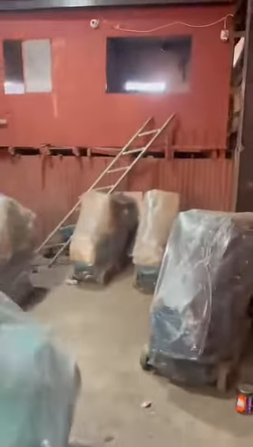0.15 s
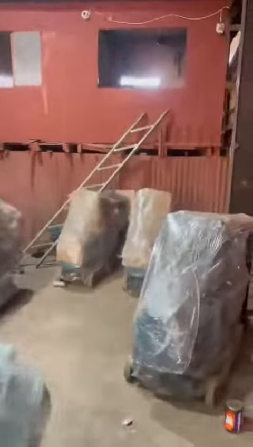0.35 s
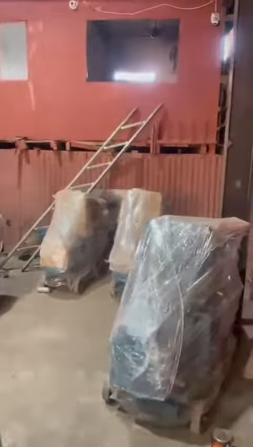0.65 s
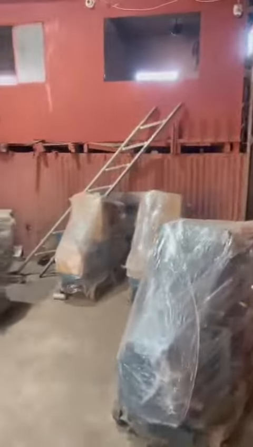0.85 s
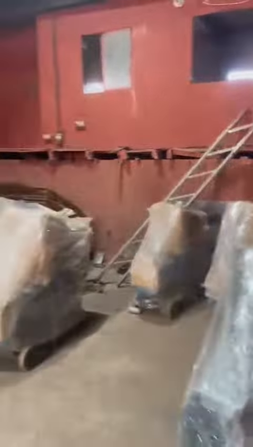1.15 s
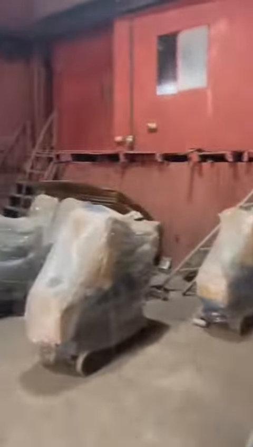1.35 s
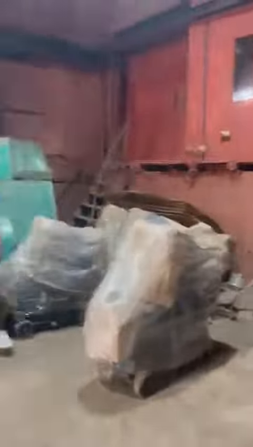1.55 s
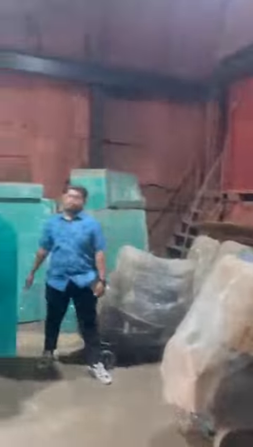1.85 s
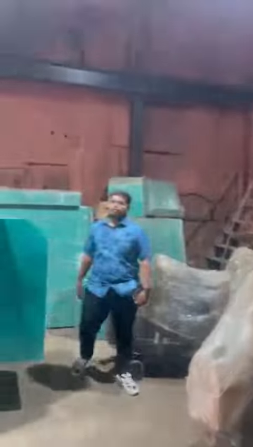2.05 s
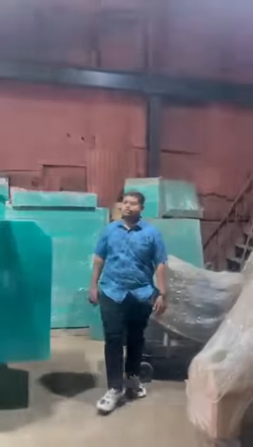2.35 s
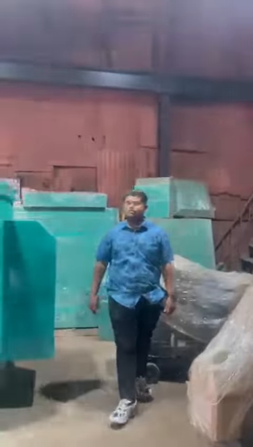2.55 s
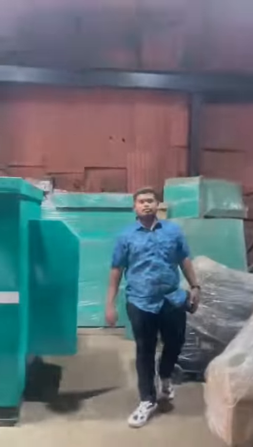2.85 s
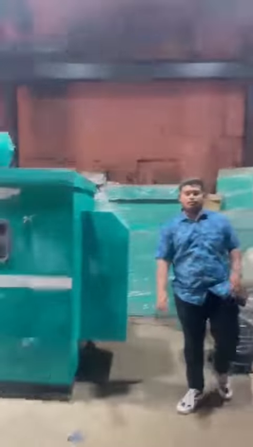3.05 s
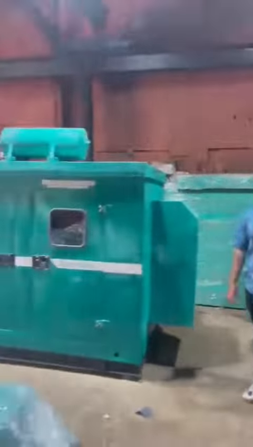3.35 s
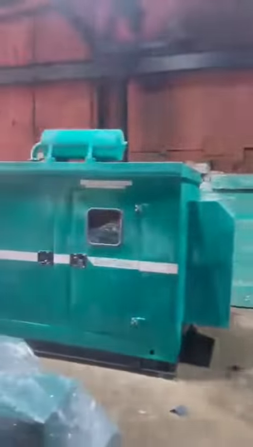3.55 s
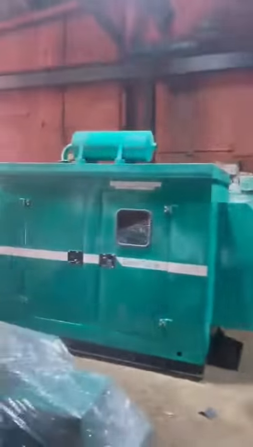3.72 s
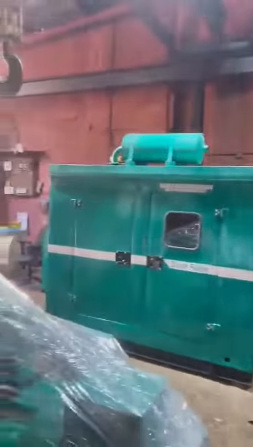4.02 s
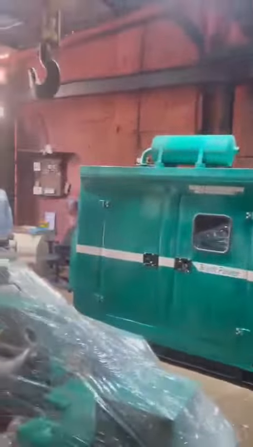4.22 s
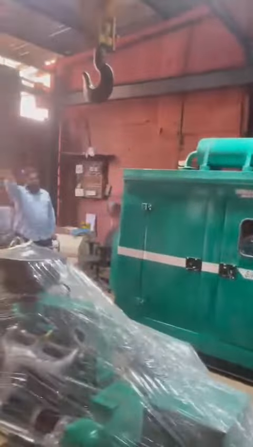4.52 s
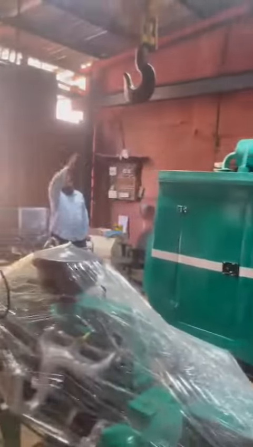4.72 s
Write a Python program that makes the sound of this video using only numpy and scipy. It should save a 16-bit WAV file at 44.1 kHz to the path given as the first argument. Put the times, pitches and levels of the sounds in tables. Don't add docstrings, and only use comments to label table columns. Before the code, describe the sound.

Inside a hard-walled steel workshop, an enclosed four-cylinder diesel generator runs throughout at unchanging speed. Its loud hum centres on low tones around 53 and 107 Hz, with higher buzzing harmonics and rough panel rumble. The tones drift and beat, swelling and fading as a handheld phone turns through wall reflections. Wide fan and combustion hiss flickers gently above: distant and bright at 0 s, growing louder and duller by 1.8 s, softer and brighter around 2.5 to 3.7 s, then louder again near 4.3 s. A thin airy whistle-like resonance near 2.5 kHz strengthens around 4.1 s. Faint valve ticks repeat about thirteen times per second with a short metallic ring, harder ones near 1.27, 2.54 and 3.5 to 3.75 s. Brief, soft sheet-metal rattles come at 1.3, 2.4 and 3.0 s. Wide stereo, steep loss of top treble; the engine is still running at the end, about 4.9 s.

```python
import sys
import numpy as np
from scipy import signal
from scipy.fft import rfft, irfft, next_fast_len
from scipy.io import wavfile
from scipy.ndimage import uniform_filter1d, minimum_filter1d, map_coordinates

SR = 44100
rng = np.random.default_rng(int(sys.argv[2]) if len(sys.argv) > 2 else 0)


def transcribe(signal):
    frames = np.atleast_2d(signal).T
    limited = np.clip(frames, -1, 1)
    pcm = np.round(limited * 32767).astype(np.int16)
    wavfile.write(sys.argv[1], SR, pcm)


def linear_from_db(decibels):
    return 10 ** (np.asarray(decibels, float) / 20)


N = 215031
TIME_S = np.arange(N) / SR
PAD = next_fast_len(N, True)
BIN_HZ = np.arange(PAD // 2 + 1) * SR / PAD

CYCLE_HZ = 13.329
SOUND_M_S = 343

# [order, level/dB rms]
DIRECT_ORDERS = [(4, -18.5), (6, -32), (8, -16.5), (9, -24.5), (10, -28.5), (11, -33.5), (12, -25.0),
                 (13, -27), (16, -33), (18, -29), (20, -35.0), (21, -36.5), (26, -28.5), (28, -35),
                 (30, -35.5), (32, -43)]
# [order, level/dB against direct, path shortening speed/(m/s), moment of opposition t/s]
WALL_ECHOES = [(4, -3.8, 1.504, 2.79), (4, -1.0, 1.086, 0.0), (6, -11.8, 0.724, 0.94),
               (8, -9.6, 0.731, 0.71), (8, -17.7, 1.314, 0.9), (9, -15.8, 1.299, 3.57),
               (9, -8.7, 0.359, 0.0), (10, -5.1, 0.443, 4.39), (10, -8.0, -0.653, 2.89),
               (11, -10.2, -1.856, 0.23), (12, -12.5, -1.309, 1.48), (12, -7.3, -0.83, 1.51),
               (13, -1.0, -0.435, 4.23), (13, -11.3, -0.746, 2.63), (16, -3.9, 0.199, 0.16),
               (16, -11.2, 0.697, 1.77), (18, -12.0, 0.674, 0.36), (18, -6.2, 0.179, 1.25),
               (20, -5.8, 0.575, 2.12), (20, -1.6, -0.194, 0.8), (21, -8.3, 0.497, 1.6),
               (26, -1.0, -0.094, 3.23), (26, -1.0, -0.473, 4.66), (26, -2.0, -0.535, 3.58),
               (28, -1.0, 0.351, 1.02), (28, -5.2, 0.502, 0.72), (30, -4.3, 0.662, 1.24),
               (30, -12.3, -0.88, 2.37), (32, -7.3, -0.21, 1.25)]
# [f/Hz, level/dB rms]
FAINT_ORDERS = [(13, -57), (27, -36), (60, -42), (190, -35.5), (250, -43), (320, -39), (400, -51),
                (540, -41.5)]
# [f/Hz, level/dB rms]
KNOCK_ORDERS = [(540, -53), (670, -50), (900, -54), (1150, -69), (1370, -51.5), (1550, -56)]
# [f/Hz, level/dB]
LOW_SIDE = [(50, -50), (110, -27), (200, -22), (300, -15), (370, -5), (500, -2), (1500, 0)]
# [f/Hz, level/dB per Hz]
PANEL_RUMBLE = [(15, -79), (40, -57), (75, -50), (110, -44), (160, -46.5), (250, -52), (400, -54.5),
                (600, -65.5), (900, -100)]
# [f/Hz, level/dB per Hz]
LOUVRE_MID = [(350, -9), (600, -8), (680, -3), (1070, -5.5), (1390, -7.5), (1590, -10.5), (2490, -12.5),
              (4780, -23), (6780, -21), (8280, -40.5), (9740, -37), (10200, -32.5), (10900, -24),
              (11900, -35), (15500, -67), (22000, -120)]
# [f/Hz, level/dB per Hz]
LOUVRE_SIDE = [(350, -45), (600, 3), (680, -2.5), (1050, -2.5), (1370, -8.5), (1780, -16.5), (2490, -11.5),
               (4720, -18.5), (5220, -18.5), (5980, -44), (6870, -24.5), (10500, -23), (11300, -28),
               (11900, -60), (15500, -93), (22000, -120)]
# [t/s, level/dB, brightness at the top/dB]
PHONE_TURN = [
    (0, -37.5, 3),
    (.6, -35.5, 0.5),
    (1.2, -32, -2),
    (1.8, -30.5, -3),
    (2.5, -33.5, 2),
    (3.1, -33, 2),
    (3.7, -33.5, 1),
    (4.3, -31.5, -2),
    (4.88, -32.5, 0),
]
# [t/s, peak level/dB]
HARD_TICKS = [(1.2685, -38), (1.6412, -47), (1.7175, -48), (2.0173, -46), (2.2423, -44), (2.3925, -48),
              (2.5421, -35), (3.5224, -37), (3.6716, -36.5), (3.7464, -39), (4.4194, -55), (4.569, -41),
              (4.6438, -46)]
# [f/Hz, t60/s, level/dB]
COVER_MODES = [(5640, .02, -4), (6150, .015, -5), (6560, .025, -3), (6845, .04, 0), (6990, .03, -2),
               (7200, .02, -4)]
# [t/s, peak level/dB, length/s]
SHEET_RATTLES = [
    (1.268, -48, 0.091),
    (2.397, -45, 0.045),
    (3.04, -48, .05),
]


def on_log(table, hz):
    f, db = np.transpose(table)
    return np.interp(np.log(np.maximum(hz, 1)), np.log(f), db)


def walk(rate, size):
    place = np.linspace(0, 1, num=600)
    smooth = map_coordinates(rng.standard_normal(200), [3 + place * rate * N / SR], order=3)
    return np.interp(np.arange(size) / size, place, smooth)


def complex_walk(rate, size):
    return (walk(rate, size) + 1j * walk(rate, size)) / np.sqrt(2)


def noise_spectrum(table):
    return rfft(rng.standard_normal(PAD)) * linear_from_db(on_log(table, BIN_HZ)) * np.sqrt(SR / 2)


def turn_level_db(s):
    at, level_db, _ = np.transpose(PHONE_TURN)
    return np.interp(s, at, level_db)


def wall_interference(order, hz, s):
    walls = 0
    for echo_order, db, speed_m_s, opposed_s in WALL_ECHOES:
        if echo_order == order:
            walls = walls + linear_from_db(db) * np.exp(2j * np.pi * hz * speed_m_s * (s - opposed_s) / SOUND_M_S)
    return 1 - walls


def engine_hum():
    smear = 0.07
    odd_db = -3.5
    port_share, port_turn = 0.05, 0.76
    step = 10
    size = N // step + 1
    s = np.arange(size) * step / SR
    direct = {int(order): db for order, db in DIRECT_ORDERS}
    out = np.zeros((2, size))
    for order in range(1, 116):
        hz = order * CYCLE_HZ
        rate = np.clip(0.52 + hz / 340.0, .1, 30)
        field = complex_walk(rate, size)
        other = complex_walk(rate, size)
        if order in direct:
            db = direct[order]
            phase = smear * order ** 2 + hz / 138.0 * walk(0.468, size)
            field = wall_interference(order, hz, s) * np.exp(1j * phase)
        else:
            table = FAINT_ORDERS if order <= 40 else KNOCK_ORDERS
            db = on_log(table, hz) + odd_db * (order % 2)
        tone = np.sqrt(2) * np.exp(2j * np.pi * hz * s)
        shared = np.sqrt(port_share) * field * np.exp(1j * port_turn)
        side = shared + np.sqrt(1 - port_share) * other
        out[0] += (linear_from_db(db) * field * tone).real
        out[1] += (linear_from_db(db + on_log(LOW_SIDE, hz)) * side * tone).real
    full = signal.resample_poly(out, step, 1, axis=1, padtype="line", window=("kaiser", 12))
    return full[:, :N]


def panel_rumble():
    mid = noise_spectrum(PANEL_RUMBLE)
    side = noise_spectrum(PANEL_RUMBLE) * linear_from_db(on_log(LOW_SIDE, BIN_HZ))
    return irfft(np.array([mid, side]), PAD)[:, :N]


def louvre_hiss():
    flicker_db, throb_db = 1.04, 0.52
    at, _, bright_db = np.transpose(PHONE_TURN)
    bright_db = np.interp(TIME_S, at, bright_db)
    both = np.array([noise_spectrum(LOUVRE_MID), noise_spectrum(LOUVRE_SIDE)])
    half_octave = np.maximum(2 * np.log2(np.maximum(BIN_HZ / 375, 1e-3)), 0)
    throb = throb_db * np.cos(2 * np.pi * 2 * CYCLE_HZ * TIME_S)
    out = 0
    for k in range(11):
        mask = np.cos(np.pi / 2 * np.clip(half_octave - k, -1, 1)) ** 2
        band_db = flicker_db * walk(6.01, N) + bright_db * k / 10 + throb
        out = out + irfft(both * mask, PAD)[:, :N] * linear_from_db(band_db)
    return out / out.std(axis=1, keepdims=True) * linear_from_db(turn_level_db(TIME_S))


def valve_ticks():
    first_s, soft_db, scatter_db, hard_db = 0.0615, -15, -0.5, -5
    burst_s = 0.028
    blows = np.zeros(N)
    beat = np.arange(first_s, N / SR, 1 / CYCLE_HZ)
    beat_db = soft_db + turn_level_db(beat) + scatter_db * rng.standard_normal(len(beat))
    blows[(beat * SR).astype(int)] = linear_from_db(beat_db)
    at, db = np.transpose(HARD_TICKS)
    blows[(at * SR).astype(int)] += linear_from_db(db + hard_db)

    s = np.arange(8000) / SR
    burst = np.exp(-s / burst_s) * np.tanh(s / 0.003)
    push = signal.fftconvolve(blows, burst)[:N] * rng.standard_normal((2, N))
    ring = np.zeros(len(s))
    for hz, t60, db in COVER_MODES:
        decay = np.tanh(s / 0.0012) * np.exp(-np.log(1000) * s / t60)
        ring += linear_from_db(db) * decay * np.sin(2 * np.pi * hz * s)
    ring = ring / np.sqrt(np.sum(ring ** 2))
    return signal.fftconvolve(push, ring[None], axes=1)[:, :N] * linear_from_db([[0], [-9]])


def singing_slats():
    hz, width_hz = 2496.0, 65.0
    level_db, facing_db, facing_s, facing_wide_s = -20.5, 5, 4.1, 0.54
    band = 1 / (1 + ((BIN_HZ - hz) / (width_hz / 2)) ** 4)
    air = irfft(rfft(rng.standard_normal((2, PAD))) * band, PAD)[:, :N]
    facing = np.exp(-((TIME_S - facing_s) / facing_wide_s) ** 2)
    return air / air.std() * linear_from_db(turn_level_db(TIME_S) + level_db + facing_db * facing)


def sheet_rattles():
    swell = np.zeros(N)
    for at, db, length_s in SHEET_RATTLES:
        swell += linear_from_db(db) * np.sin(np.pi * np.clip((TIME_S - at) / length_s, 0, 1))
    band = signal.butter(2, [4500, 10500], "bandpass", fs=SR, output="sos")
    return swell * signal.sosfilt(band, rng.standard_normal((2, N))) * linear_from_db([[-8], [0]])


def scene():
    engine = engine_hum() + panel_rumble() + louvre_hiss()
    mid, side = engine + valve_ticks() + singing_slats() + sheet_rattles()
    return np.array([mid + side, mid - side])


def roll_off(x):
    return signal.sosfilt(signal.butter(12, 11700, fs=SR, output="sos"), x)


def record(dry):
    peak = np.abs(dry).max(axis=0) + 1e-9
    room = minimum_filter1d(np.minimum(1, .9 / peak), size=801)
    gain = uniform_filter1d(uniform_filter1d(room, size=401), size=401)
    return roll_off(dry * gain)


dry = scene()
out = record(dry)
transcribe(out)
```